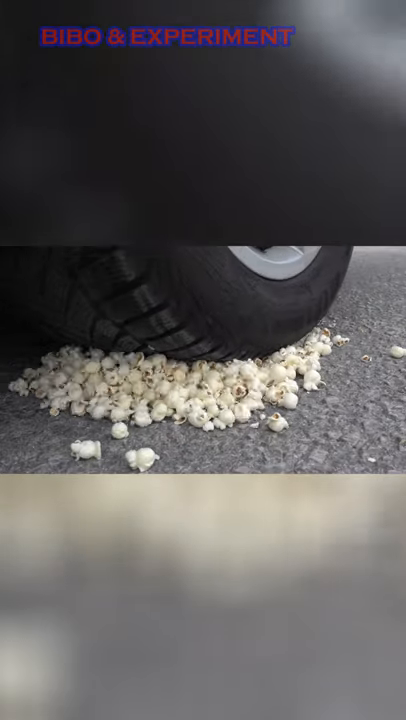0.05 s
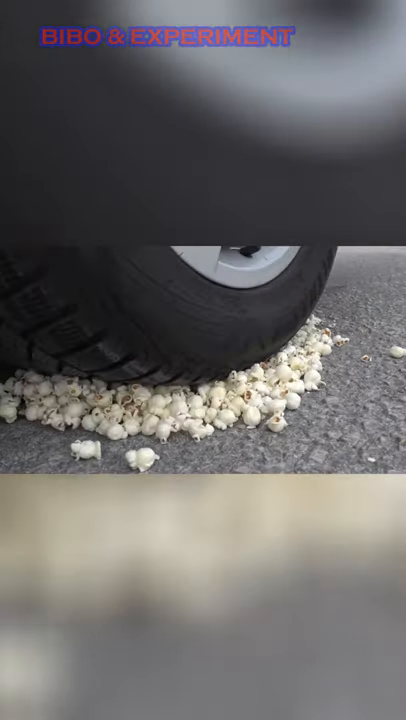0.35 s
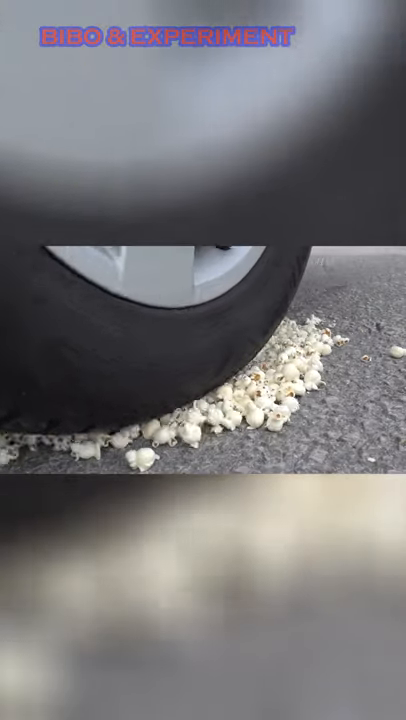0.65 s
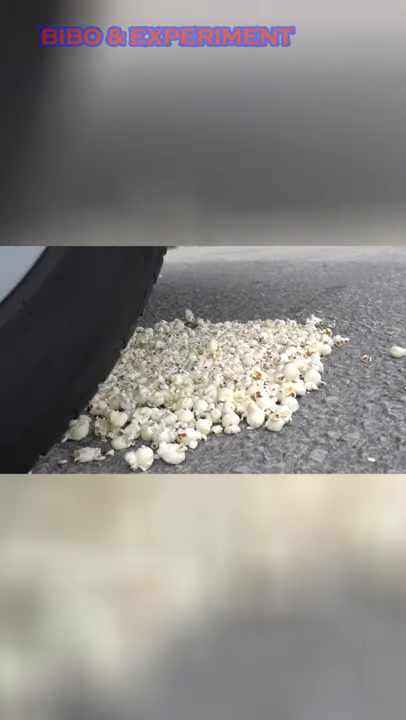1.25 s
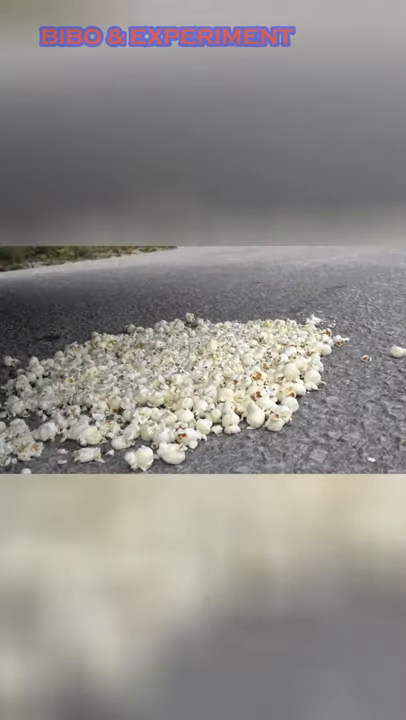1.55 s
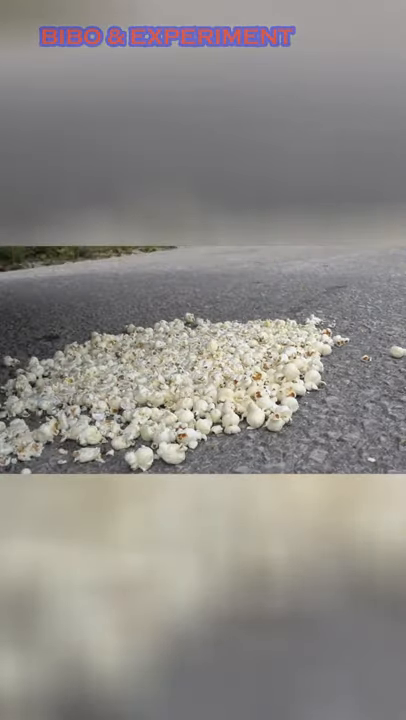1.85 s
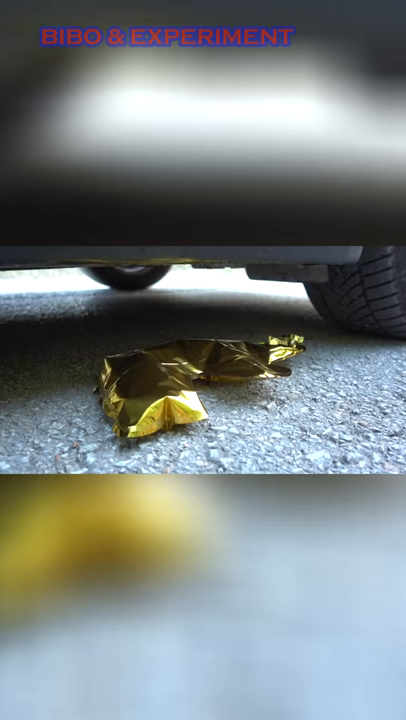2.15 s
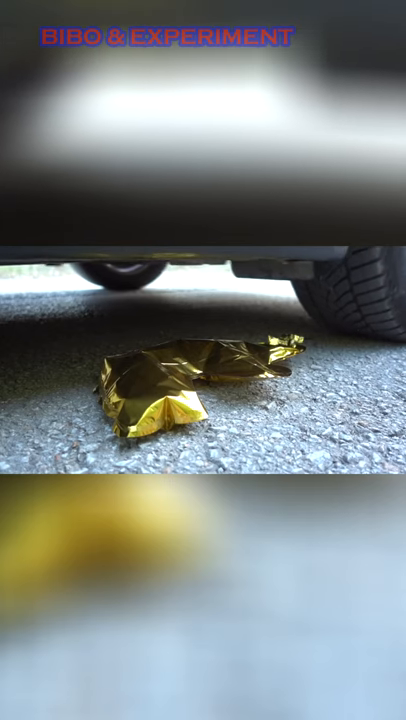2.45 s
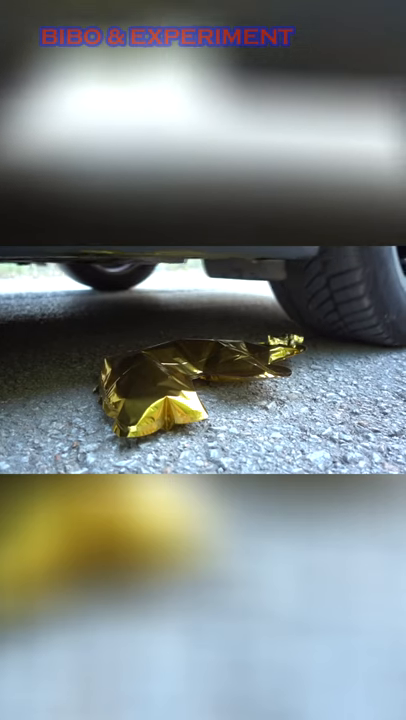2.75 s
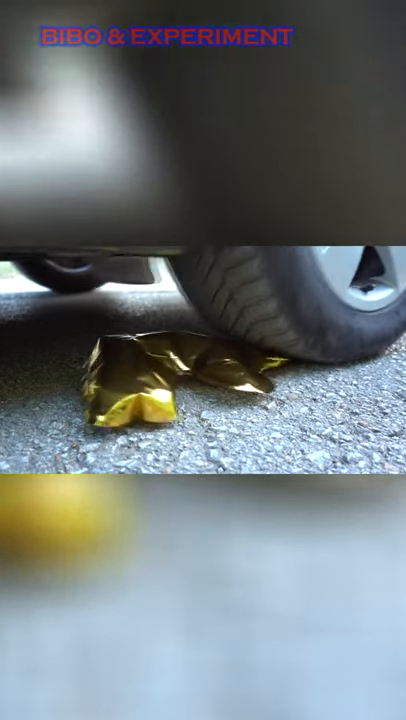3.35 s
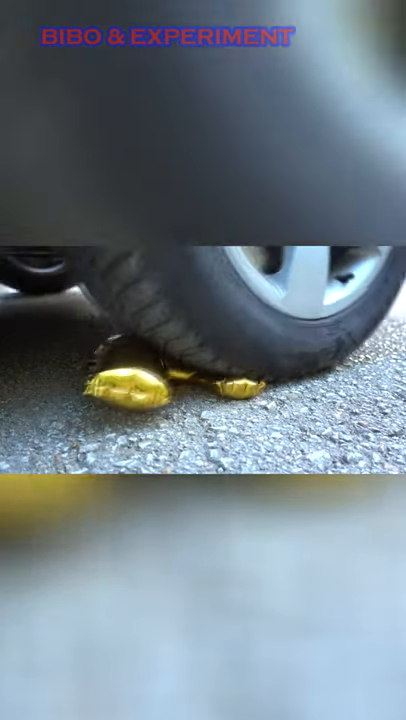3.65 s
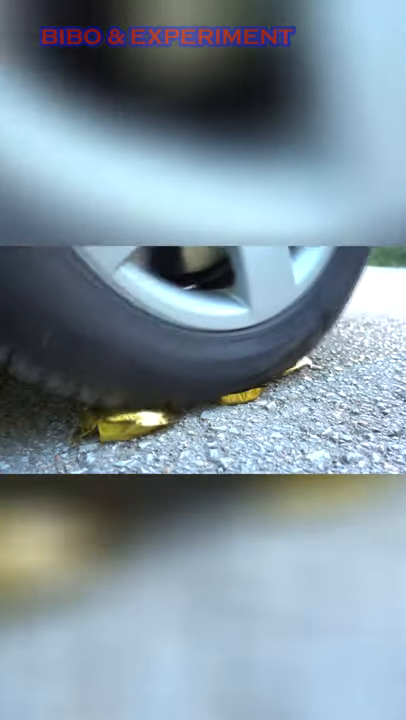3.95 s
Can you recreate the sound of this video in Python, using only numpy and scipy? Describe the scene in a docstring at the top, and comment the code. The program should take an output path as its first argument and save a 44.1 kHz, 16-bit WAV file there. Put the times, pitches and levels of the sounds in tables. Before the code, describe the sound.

A car tyre crunches slowly through popcorn on asphalt, close to the microphone. The engine idles and a few dull knocks follow. Then the tyre crumples a foil balloon, which squeals, hisses and bursts.

```python
"""On asphalt, a stereo microphone close to the wheel. A car tyre rolls slowly over a heap of popcorn, breaking
thousands of kernels, and the car creeps on, idling. At 2 s, after a brief silence, the scene changes: the car
is heard from further off, with a few dull knocks. Just after 3 s it rolls onto a foil balloon: the foil
crackles, air hisses and squeals out through a leak, and just before 4 s the balloon bursts."""
import sys
import numpy as np
from scipy import signal
from scipy.fft import rfft, irfft, next_fast_len
from scipy.io import wavfile
from scipy.ndimage import map_coordinates

SR = 44100
rng = np.random.default_rng(int(sys.argv[2]) if len(sys.argv) > 2 else 0)


def master_out(mix):
    """Clip the mix to full scale and print it as 16-bit PCM to the path in sys.argv[1]."""
    frames = np.transpose(np.atleast_2d(mix))
    ceiling = np.clip(frames, -1, 1)
    pcm = np.round(ceiling * 32767).astype(np.int16)
    wavfile.write(sys.argv[1], SR, pcm)


N = 176400
T = np.arange(N) / SR
SIDES = np.array([[.5], [-.5]])  # splits a difference between left and right
TOP_HZ = 11200
SILENT_FROM_S, SILENT_TO_S = 1.994, 2.027


def amp(db):
    """Decibels to gain."""
    return 10 ** (np.asarray(db) / 20)


def unit(x):
    """Scale to rms 1."""
    return x / np.sqrt(np.mean(x ** 2) + 1e-20)


def along(points, hz):
    """Read (frequency, value) points on a log axis."""
    freqs, values = np.transpose(points)
    return np.interp(np.log(hz + 1), np.log(freqs + 1), values)


def curves(rows):
    """One value per sample for each column after the time."""
    times, *columns = np.transpose(rows)
    return [np.interp(T, times, column) for column in columns]


def between(start, end=np.inf):
    """A gate with millisecond edges."""
    return np.clip(np.minimum(T - start, end - T) * 1000, 0, 1)


def wobble(rate):
    """A smooth random curve, rate knots a second."""
    return map_coordinates(rng.standard_normal(N // 8), [T * rate], mode="wrap")


def filtered(x, response):
    """Apply a frequency response to x."""
    size = next_fast_len(N + SR // 4)
    return irfft(rfft(x, size) * response(np.fft.rfftfreq(size, 1 / SR)), size)[..., :N]


def pan(left_db):
    """Left and right gains, the left louder by left_db."""
    return amp(SIDES * left_db)


def leading(x, lead_s):
    """A source off to the left reaches the left microphone first."""
    return filtered(x, lambda hz: np.exp(2j * np.pi * hz * lead_s * SIDES))


# How alike the two microphones hear the street: (frequency [Hz], correlation [0-1])
LIKENESS = [(100, 1), (1000, 0.93), (2000, 0.76), (4000, 0.46), (10000, 0.42)]
def spread(pair):
    """Two unrelated signals become left and right, alike in the bass."""
    turn = lambda hz: np.arccos(along(LIKENESS, hz)) / 2
    mid, side = filtered(pair, lambda hz: np.array([np.cos(turn(hz)), np.sin(turn(hz))]))
    return np.array([mid + side, mid - side])


def noise(tone, envelope=1):
    """Coloured stereo noise of rms 1; tone lists (frequency [Hz], level [dB])."""
    white = envelope * rng.standard_normal((2, N))
    return unit(spread(filtered(white, lambda hz: amp(along(tone, hz)))))


def underbody(x, echo_db=-6, echo_s=0.0048):
    """The direct sound and its quick scatter between road, tyre and car floor."""
    t = np.arange(SR // 25) / SR
    shared, left, right = rng.standard_normal((3, len(t))) * np.exp(-t / echo_s)
    echo = shared + 0.69 * np.diff([left, right], prepend=0)
    echo *= amp(echo_db) / np.linalg.norm(shared) / np.sqrt(2)
    echo[:, 0] = 1  # straight to the microphone
    return signal.fftconvolve(x, echo, axes=1)[:, :N]


def crackle(tone, rate, size_db, life_s, bed=0.24):
    """A stream of quickly dying puffs of uneven size, rate a second, over a bed of steady noise."""
    size = amp(size_db * np.minimum(rng.exponential(size=N), 4))
    hits = (rng.random(N) < rate / SR) * size ** 2
    power = signal.lfilter([1], [1, -np.exp(-2 / (life_s * SR))], hits)
    envelope = np.sqrt(power + bed * power.mean())
    return unit(underbody(noise(tone, envelope)))


def snaps(rows, rise_cycles, crack, crack_s, low_cut_hz=400):
    """Each snap is a few cycles at its pitch and a broad crack."""
    ring, puff = np.zeros(N), np.zeros(N)
    t = np.arange(SR // 40) / SR
    for at, db, hz in rows:
        i = round(at * SR)
        age = t * hz / rise_cycles
        ring[i:i + len(t)] += amp(db) * np.sin(2 * np.pi * hz * t) * age * np.exp(1 - age)
        puff[i:i + len(t)] += amp(db) * crack * np.exp(-t / crack_s)
    ring = filtered(ring, lambda hz: 1j * hz / (1j * hz + low_cut_hz))
    cracks = puff * noise([(100, -38), (1500, -1.5), (11000, 0.5)])
    return underbody(ring + cracks, echo_db=-7.5)


# The engine from further off: (frequency [Hz], level [dB])
FAR_SPECTRUM = [(25, -5.5), (110, -3.5), (650, -10.5), (1000, -16), (2400, -18), (11000, -34)]
def car_far(end_s=3.715):
    """The quiet idle of the car further off, no longer heard once the loud squeal and hiss begin."""
    return amp(-53 + 0.95 * wobble(15)) * noise(FAR_SPECTRUM) * between(SILENT_TO_S, end_s)


# The car passing close to the microphone: (time [s], rumble [dB], whirr [dB])
NEAR_LEVELS = [(1.15, -56.5, -45.5), (1.36, -45.5, -46.5), (1.62, -49, -43.5), (1.88, -49.5, -42)]
# The engine's whirr at close range: (frequency [Hz], level [dB])
WHIRR_SPECTRUM = [(90, -32), (200, -0.5), (400, -9), (620, -7.5), (1640, -7), (3360, -15.5), (11000, -30)]
# Its thin whines: (frequency [Hz], level [dB])
ENGINE_WHINES = [(1416, -55.5), (1626, -54.5), (1852, -65), (2126, -53), (4307, -57.5)]
def car_near():
    """The idling car close by: exhaust rumble, and the engine's whirr and unsteady whines to the left."""
    rumble_db, whirr_db = curves(NEAR_LEVELS)
    rumble = amp(rumble_db) * noise([(40, -16), (85, -3.5), (135, -7), (200, -16), (500, -38.5)])
    fade_in = np.minimum(T / NEAR_LEVELS[0][0], 1)
    whirr = amp(whirr_db) * crackle(WHIRR_SPECTRUM, rate=1700, size_db=1.5, life_s=0.0068)
    whines = sum(amp(db) * np.sin(2 * np.pi * hz * T + 1.3 * wobble(24.74)) for hz, db in ENGINE_WHINES)
    engine = leading(whirr + whines, lead_s=0.00008) * pan(3.4)
    return (rumble * fade_in + engine) * between(0, SILENT_FROM_S)


def rush(end_s=2.085, fall_db_per_s=88):
    """A short rush of noise, coloured like the whirr, ends the silence."""
    level_db = -34 - fall_db_per_s * np.abs(T - SILENT_TO_S)
    return amp(level_db) * noise(WHIRR_SPECTRUM) * between(SILENT_TO_S, end_s)


# Dull knocks from the car, near the centre: (time [s], thump [dB], rattle [dB])
CAR_KNOCKS = [(1.847, -40, -31), (2.527, -55, -42.5), (2.657, -30, -34.5), (2.724, -30.5, -37.5),
              (2.883, -33.5, -36), (3.151, -34, -36.5)]
# Their rattle: (frequency [Hz], level [dB])
RATTLE_SPECTRUM = [(50, -8), (700, 3.5), (1400, -12), (2700, -9.5), (6000, -51)]
# Short hollow tones: (time [s], level [dB], pitch [Hz], length [s])
HOLLOW_TONES = [(1.84, -35.5, 440, 0.039), (2.47, -42, 367.6, 0.025)]
def knocks(thump_hz=170, thump_s=0.005, rise_s=0.0024, rattle_s=0.019):
    """Each knock is a low push and a dull rattle; two hollow tones sound among them."""
    thump, rattle, hollow = np.zeros((3, N))
    for at, thump_db, rattle_db in CAR_KNOCKS:
        t = np.maximum(T - at, 0)
        thump -= amp(thump_db) * np.sin(2 * np.pi * thump_hz * t) * np.exp(-t / thump_s)
        rattle += amp(rattle_db) * (1 - np.exp(-t / rise_s)) * np.exp(-t / rattle_s)
    for at, db, hz, length in HOLLOW_TONES:
        swell = np.sin(np.pi * np.clip((T - at) / length, 0, 1))
        hollow += amp(db) * swell * np.sin(2 * np.pi * hz * T + 2.1 * wobble(90))
    return (thump + rattle * noise(RATTLE_SPECTRUM)) * pan(-0.92) + hollow


def crumbs(crush_db, end_s, count=400, low_hz=1900, high_hz=10000, scatter_db=3):
    """Random kernels tick, each at its own pitch, following the level of the crush."""
    when, pitch = rng.random((count, 2)).T
    at = when * end_s
    hz = low_hz * (high_hz / low_hz) ** pitch
    db = np.interp(at, T, crush_db) + scatter_db * rng.standard_normal(count).clip(-2, 2)
    return snaps(zip(at, db, hz), rise_cycles=0.41, crack=0.85, crack_s=0.00031)


# Clumps of popcorn, hollower under the full weight: (time [s], level [dB], pitch [Hz], half length [s])
KERNEL_CLUMPS = [(0.206, -25.5, 1120, 0.012), (0.23, -30, 2720, 0.04), (0.387, -27.5, 3280, 0.018),
                 (0.595, -26, 3080, 0.02), (0.725, -32, 3630, 0.06), (0.8, -30.5, 710, 0.08)]
def clumps(edge_db=-15):
    """Kernels give way together in a brief swell of cracks, mostly within an octave of one pitch."""
    cracks = np.zeros((2, N))
    for at, db, hz, half_s in KERNEL_CLUMPS:
        tone = [(hz / 2, edge_db), (hz, 0), (2 * hz, edge_db), (TOP_HZ, 2 * edge_db)]
        swell = np.exp(-((T - at) / half_s) ** 2)
        cracks += amp(db) * swell * crackle(tone, rate=350, size_db=0, life_s=0.0015)
    return cracks


# The heap under the tread, close up: (time [s], crisp treble [dB], crunching middle [dB])
CRUSH_LEVELS = [(0.0, -20.5, -31.5), (0.45, -19, -29.5), (0.62, -21, -30), (0.85, -23, -32.5),
                (1.01, -29, -31.5), (1.045, -39.5, -46), (1.3, -49, -62)]
# Those two bands: (frequency [Hz], level [dB])
CRISP_SPECTRUM = [(250, -44), (1500, -9.5), (3400, -1), (5900, -4.5), (11000, -6)]
CRUNCH_SPECTRUM = [(45, -46), (130, -6), (350, -7), (750, 1.5), (1700, -5.5), (3500, -39)]
# Single kernels breaking: (time [s], level [dB], pitch [Hz])
KERNEL_SNAPS = [(0.0262, -9, 3000), (0.0658, -10, 6000), (0.3193, -14.5, 1920), (0.5017, -21, 5000),
                (0.947, -18.5, 3930), (1.0045, -17, 1140), (1.0235, -19, 1450), (1.0612, -21, 1150),
                (1.1475, -25.5, 1190), (1.1698, -24.5, 2500)]
def popcorn():
    """Thousands of kernels break against the asphalt, drifting slightly left with the tyre."""
    crisp_db, crunch_db = curves(CRUSH_LEVELS)
    uneven_db = 1.28 * wobble(45.24)
    crisp = amp(crisp_db + uneven_db) * crackle(CRISP_SPECTRUM, rate=2000, size_db=1, life_s=0.00015)
    crunch = amp(crunch_db + uneven_db) * crackle(CRUNCH_SPECTRUM, rate=900, size_db=1, life_s=0.0011)
    kernels = snaps(KERNEL_SNAPS, rise_cycles=0.51, crack=1.22, crack_s=0.00075)
    fade = np.clip((1.45 - T) / 0.15, 0, 1)
    heap = (crisp + crunch) * fade + clumps() + kernels + 2 * crumbs(crisp_db, CRUSH_LEVELS[-1][0])
    return heap * pan(0.5 + 1.1 * T.clip(0, 1.2))


# Foil under the tyre, close up: (time [s], treble [dB], middle [dB], low crumpling [dB])
FOIL_LEVELS = [(3.22, -77, -56, -56), (3.27, -42, -57, -49.5), (3.32, -46, -44.5, -49.5),
               (3.385, -29.5, -33.5, -46.5), (3.428, -45, -47, -53), (3.484, -26, -26.5, -42),
               (3.555, -26.5, -31.5, -39), (3.604, -20, -23, -22), (3.645, -22.5, -18, -22.5),
               (3.675, -26, -20.5, -31), (3.706, -26.5, -17, -35), (3.73, -35, -34, -58),
               (3.83, -36.5, -49, -59), (3.945, -39.5, -27.5, -58)]
# Those three bands: (frequency [Hz], level [dB])
TREBLE_SPECTRUM = [(1400, -18.5), (2400, -1.5), (7000, -4), (11000, -12.5)]
MIDDLE_SPECTRUM = [(400, -25), (900, -0.5), (1400, 1), (2200, -2), (3500, -7)]
LOW_SPECTRUM = [(30, -22), (170, -0.5), (600, 0), (1400, -10.5), (3000, -32)]
# Single creases snapping: (time [s], level [dB], pitch [Hz])
CREASE_SNAPS = [(3.1194, -28, 2620), (3.268, -30, 2420), (3.2886, -28, 2440), (3.3425, -21, 3320),
                (3.4732, -22, 2070), (3.486, -12, 2100), (3.5017, -12, 1900), (3.5296, -20, 2260),
                (3.5626, -19, 1130), (3.381, -23, 3530), (3.6626, -7.5, 3030), (3.6942, -14, 1480)]
def foil():
    """The tread creases the foil, and crumples it deeply as the weight comes on."""
    treble_db, middle_db, low_db = curves(FOIL_LEVELS)
    treble = amp(treble_db) * crackle(TREBLE_SPECTRUM, rate=510, size_db=4, life_s=0.00018, bed=0.26)
    middle = amp(middle_db) * crackle(MIDDLE_SPECTRUM, rate=950, size_db=3.5, life_s=0.0013)
    low = amp(low_db) * crackle(LOW_SPECTRUM, rate=850, size_db=2.5, life_s=0.0016)
    creases = snaps(CREASE_SNAPS, rise_cycles=0.83, crack=0.43, crack_s=0.00022)
    return ((treble + middle + low) * between(FOIL_LEVELS[0][0]) + creases) * pan(-0.66)


# Air escaping in front of the microphone: (time [s], level [dB])
HISS_LEVELS = [(3.68, -58), (3.715, -26.5), (3.86, -23), (3.945, -18.5), (4.0, -76)]
# Its colour: (frequency [Hz], level [dB])
HISS_SPECTRUM = [(250, -33), (700, -8), (2000, -9.5), (4500, 2.5), (7000, -1), (11000, -6)]
def hiss():
    """Air hisses out through a slit in the squeezed balloon."""
    hiss_db, = curves(HISS_LEVELS)
    return amp(hiss_db + 1.2 * wobble(200)) * noise(HISS_SPECTRUM) * between(HISS_LEVELS[0][0])


# The slit under the car: (time [s], pitch [Hz], fundamental [dB], octave [dB], roughness [0-1])
SQUEAL_TRACK = [(3.701, 5310, -39, -55, 0.7), (3.715, 5090, -21, -25, 0.52), (3.722, 4530, -16, -32, 0.09),
                (3.74, 4280, -15, -23.5, 0.09), (3.75, 4130, -21.5, -23.5, 0.1),
                (3.766, 4246, -14.5, -22, 0.08), (3.796, 4553, -22.5, -27, 0.1),
                (3.839, 5100, -16, -26.5, 0.03), (3.844, 5300, -40, -34, 0.16),
                (3.865, 5165, -34, -29, 0.08), (3.873, 5340, -27, -25, 0.4), (3.905, 4865, -19, -32, 0.74),
                (3.945, 4300, -40, -58, 0.7)]
# Its lips vibrating at half their rate: (start [s], end [s], level [dB])
HALF_RATE_SPELLS = [(3.745, 3.758, -29), (3.84, 3.87, -19)]
def squeal(flutter_hz=450, undertone_db=-13):
    """The lips of the slit squeal in the escaping air, twice drop to half their rate, then flutter."""
    hz, first_db, octave_db, rough = curves(SQUEAL_TRACK)
    unsteady_hz = hz + flutter_hz * rough * wobble(1100) + 35 * wobble(150)
    phase = 2 * np.pi * np.cumsum(unsteady_hz) / SR
    first = amp(first_db + 1.7 * wobble(250)) * np.sin(phase + 0.2 * wobble(900) + 1.1 * SIDES)
    octave = amp(octave_db + 2.7 * wobble(500)) * np.sin(2 * phase + 0.5 * wobble(1600) + 0.95 * SIDES)
    halving = sum(amp(db) * between(start, end) for start, end, db in HALF_RATE_SPELLS)
    half_tones = np.sin(3 * phase / 2) + amp(undertone_db) * np.sin(phase / 2)
    lips = first * pan(2) + octave * pan(-2.2) + halving * amp(2.1 * wobble(400)) * half_tones
    return underbody(np.sqrt(2) * lips * between(SQUEAL_TRACK[0][0], BURST_S), echo_db=-7)


BURST_S = 3.9568
# Resonances of the gap between tyre and road: (frequency [Hz], width [Hz], level [dB])
GAP_MODES = [(185, 120, -6.5), (444, 210, -4), (625, 81, 1), (764, 160, 5.5), (1243, 160, -6.5),
             (2660, 250, -15)]
def burst(boom_db=-7, fall_db_per_s=168, swell_s=0.0038, tear_db=-15, tear_s=0.018):
    """Close to the microphone the seam tears open, and the air booms between tyre and road."""
    def gap(hz):
        return sum(amp(db) * 1j * hz * width / (centre ** 2 - hz ** 2 + 1j * hz * width)
                   for centre, width, db in GAP_MODES)
    t = np.maximum(T - BURST_S, 0)
    air = unit(filtered(spread(rng.standard_normal((2, N))), gap))
    envelope = amp(boom_db - fall_db_per_s * t) * (1 - np.exp(-t / swell_s))
    boom = envelope * unit(np.tanh(0.46 * air))
    tear = amp(tear_db) * np.exp(-t / tear_s) * noise([(50, -20), (200, 5.5), (3000, 10), (6000, -19)])
    return (T > BURST_S) * (boom + tear) * pan(1)


def scene():
    """From the roadside: popcorn first, then the balloon, with the car behind both."""
    return popcorn() + car_near() + rush() + car_far() + knocks() + foil() + squeal() + hiss() + burst()


def record(dry):
    """The recorder clips at full scale and keeps nothing above its band limit."""
    return filtered(np.clip(dry, -1, 1), lambda hz: np.clip((TOP_HZ - hz) / 200 + 0.5, 0, 1))


dry = scene()
out = record(dry)
master_out(out)
```